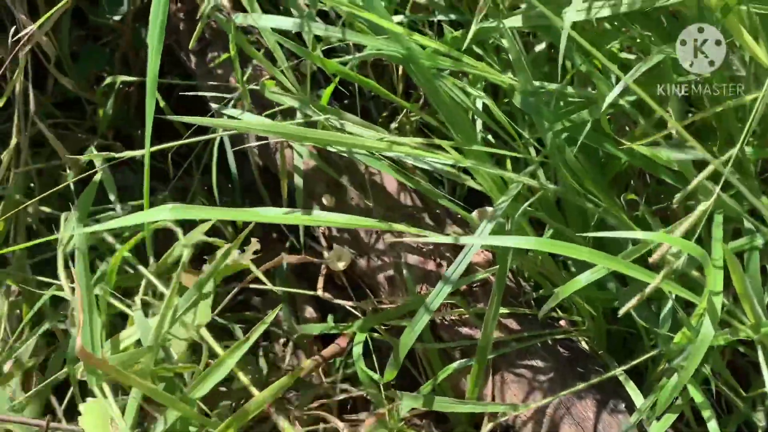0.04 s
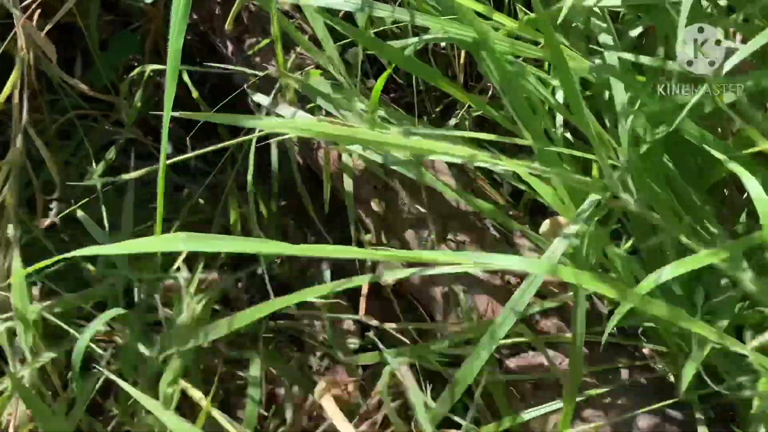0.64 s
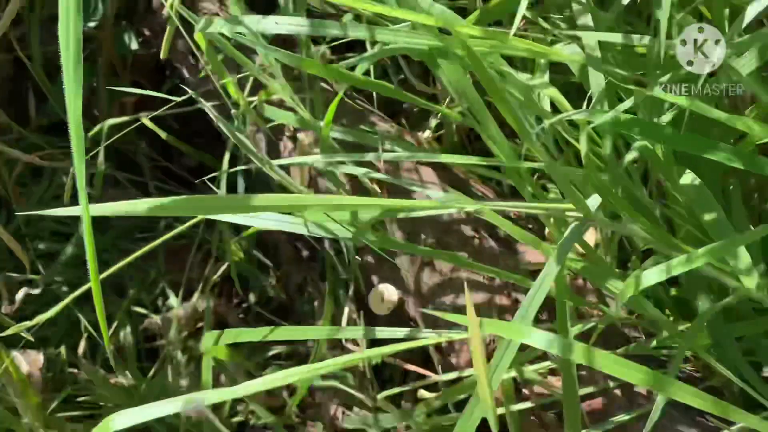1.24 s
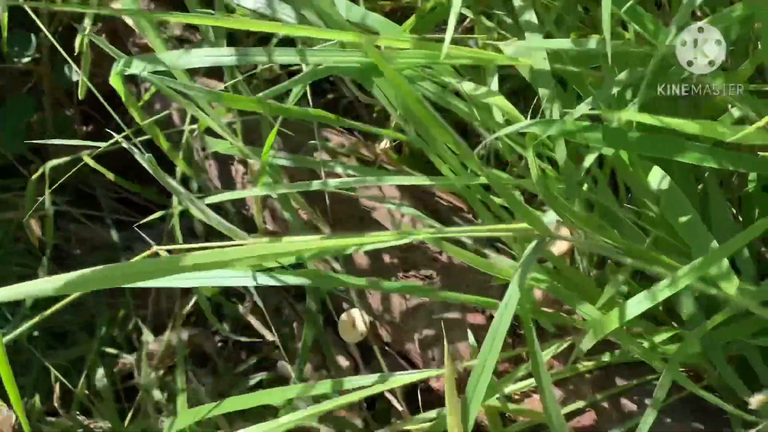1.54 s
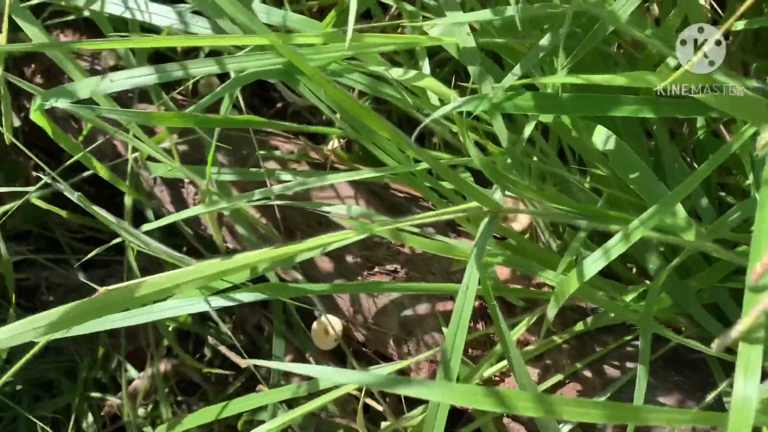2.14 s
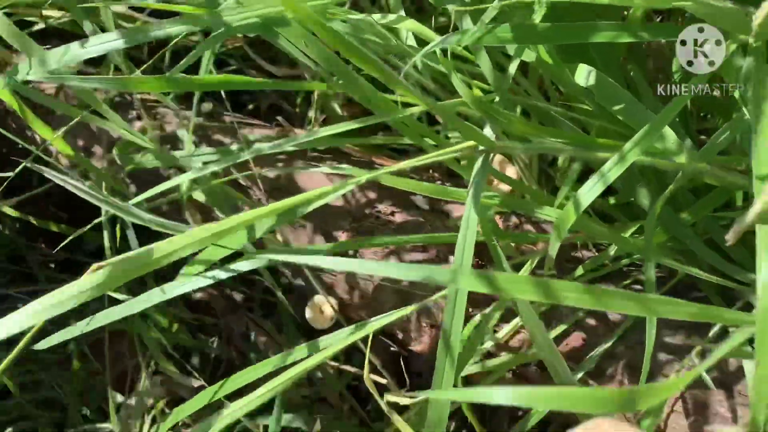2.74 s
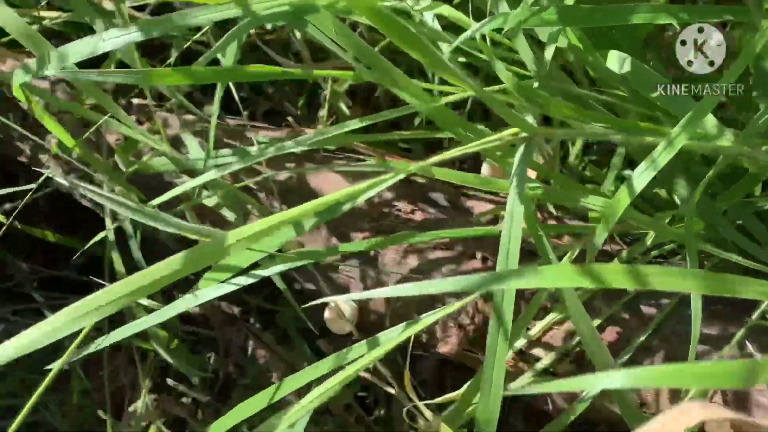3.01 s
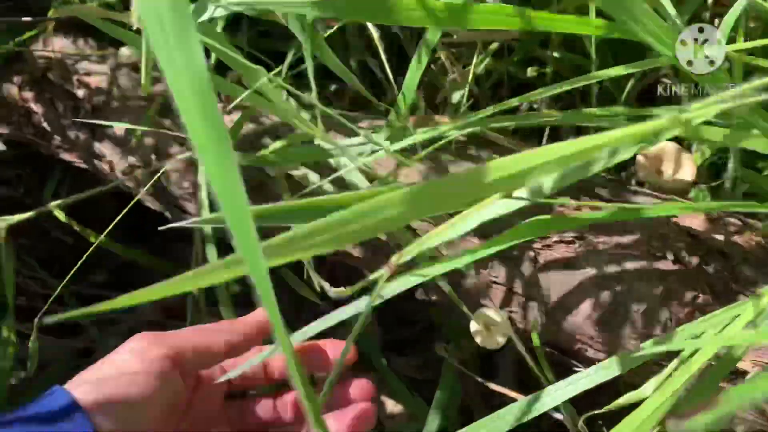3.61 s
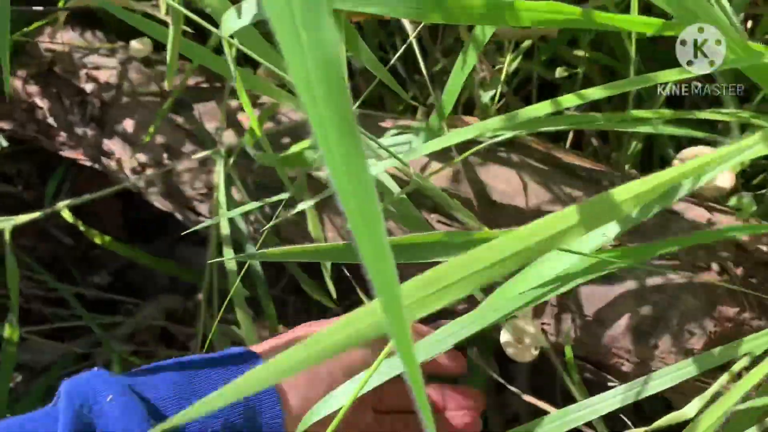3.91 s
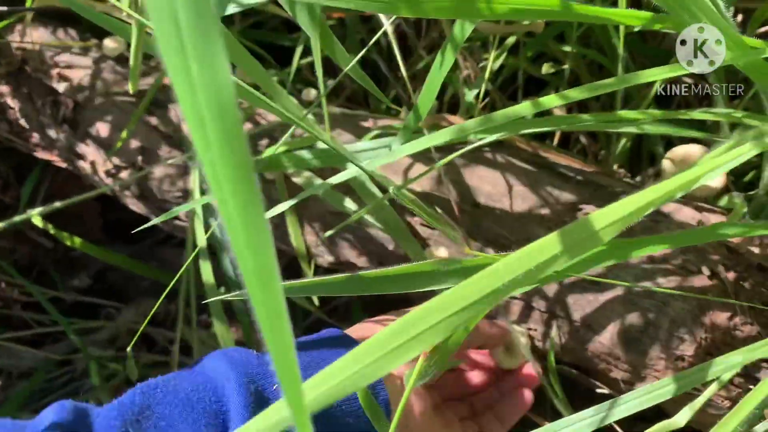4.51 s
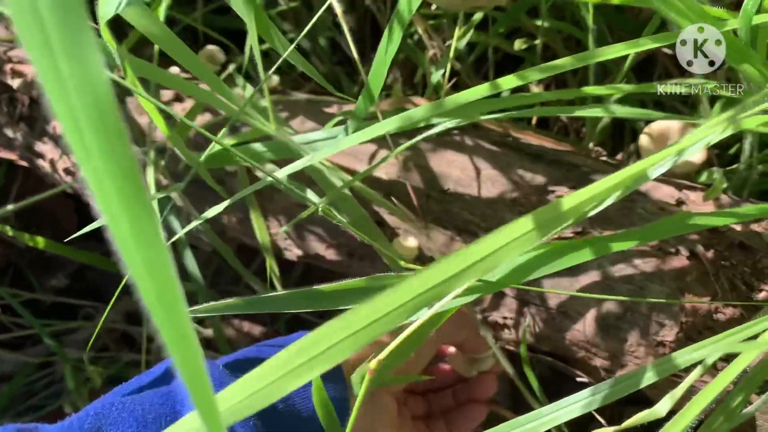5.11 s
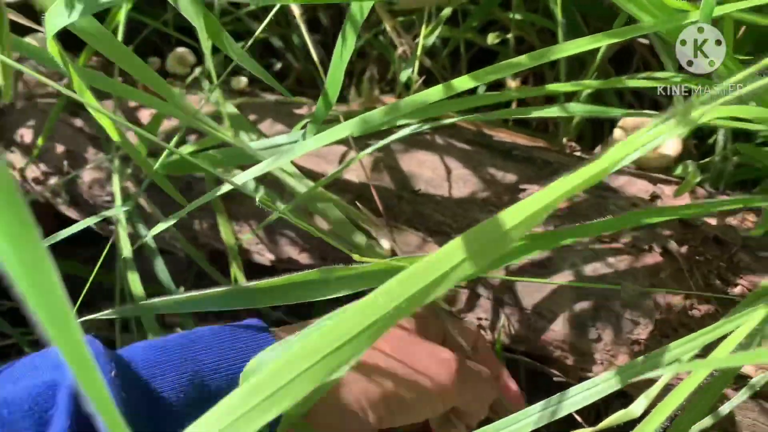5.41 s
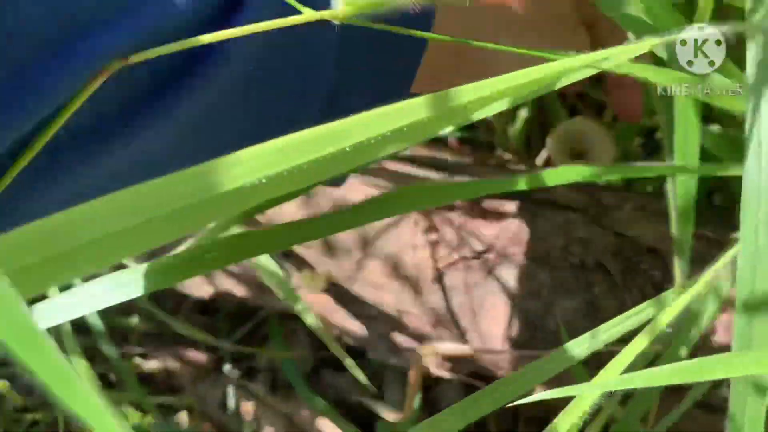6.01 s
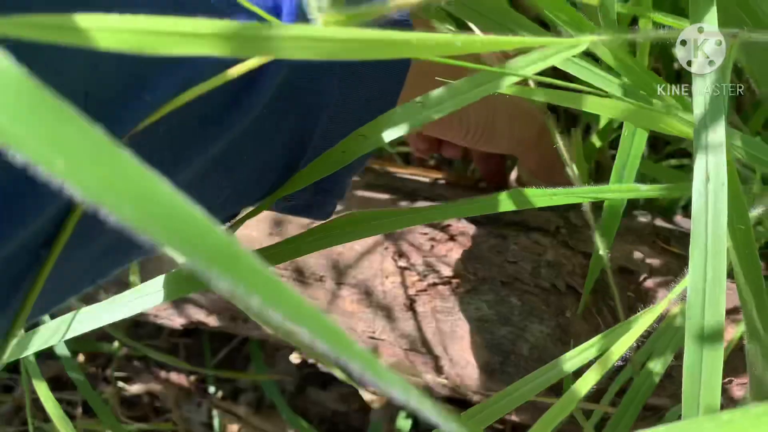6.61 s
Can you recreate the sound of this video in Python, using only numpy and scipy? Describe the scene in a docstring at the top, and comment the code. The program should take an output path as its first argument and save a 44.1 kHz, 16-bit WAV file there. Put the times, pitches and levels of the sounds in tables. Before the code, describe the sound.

Tall grass swishes and scrapes close against the microphone, with crisp stem snaps, then softens to a faint rustle and a few clicks.

```python
"""Tall grass swishes as someone pushes through it: rough blades slide over a low-held phone and
stalks bump it. Then a sleeved arm reaches down to a log, stems snap softly under the hand and
the grass stirs again. The phone's two closely spaced microphones (mics) hear all this over
a quiet outdoor rumble and one faint bird peep."""
import sys
import numpy as np
from scipy import signal
from scipy.fft import rfft, irfft, next_fast_len
from scipy.io import wavfile
from scipy.ndimage import uniform_filter1d, map_coordinates

SR = 44100
rng = np.random.default_rng(int(sys.argv[2]) if len(sys.argv) > 2 else 0)


def inscribe(sig):
    """Save sig as 16-bit PCM at rate SR to the path in sys.argv[1].

    A 1-D sig is mono; a 2-D sig holds one channel per row.
    Samples are clipped to [-1, 1] before scaling.
    """
    pcm = np.round(np.clip(np.atleast_2d(sig).T, -1, 1) * 32767)
    wavfile.write(sys.argv[1], SR, pcm.astype(np.int16))


N = 297675  # 6.75 seconds

# How alike the two mics sound at each pitch: (frequency [Hz], likeness [0-1], left mic's lead [radians])
MIC_PAIR = [(40, 0.87, 0.5), (153, 0.75, 0.12), (357, 0.87, 0.6), (694, 1, 1.83), (1050, 0.37, 1.5),
            (1520, 0.15, 2.5), (2520, 0.04, 2), (4950, 0.05, 6.5), (6180, 0.35, 6.5), (9130, 0.72, 2.5),
            (10420, 0.83, 0.5), (13480, 1, -3), (14900, 0.9, -5)]
# A "colour" says how strong the low and high pitches of a noise are.
# The deep rumble of the open air: (frequency [Hz], level [dB])
RUMBLE_COLOUR = [(12, -49), (20, -19), (60, 1.5), (109, -6.5), (151, -5), (258, -17), (328, -27),
                 (369, -31), (700, -20.5), (910, -56), (1540, -120)]
# The sleeve sliding along the log: (time [s], level [dB])
SLEEVE_LEVELS = [(3.9, -90), (4.1, -64.5), (4.35, -83), (4.55, -79.5), (5.45, -82), (5.53, -67.5),
                 (5.62, -66), (5.73, -67), (5.79, -67), (5.85, -86)]
# The dull sound of cloth on bark: (frequency [Hz], level [dB])
CLOTH_COLOUR = [(90, -48), (255, 4), (330, 1), (450, 3), (620, -10), (1500, -35)]
# Stalks knocking on the phone or the log. A "decay" is the time a sound takes to fade by 60 dB:
# (time [s], level [dB], first pitch [Hz], last pitch [Hz], decay [s])
STALK_THUMPS = [(0.133, -50, 258, 150, 0.053), (0.162, -49, 260, 89.5, 0.12), (0.385, -41, 290, 110, 0.078),
                (1.824, -40, 257, 78.6, 0.075), (2.354, -38.5, 328, 240, 0.04),
                (3.21, -37.5, 450, 60, 0.091), (3.662, -55.5, 81, 55.3, 0.47), (3.997, -46, 136, 50, 0.14),
                (4.658, -41, 407, 350, 0.018), (4.8672, -30.5, 374, 284, 0.022)]
# Short drags of a stalk, a leaf or the cuff:
# (middle time [s], level [dB], pitch [Hz], length [s], level half an octave from the pitch [dB])
SHORT_DRAGS = [(0.105, -37, 1330, 0.0091, -11), (0.113, -36.5, 4500, 0.0088, -7),
               (0.154, -40, 3000, 0.0049, -15), (0.141, -41.5, 950, 0.015, -11),
               (0.388, -37.5, 750, .007, -7), (0.76, -37.5, 3400, 0.0086, 0), (1.114, -41, 870, 0.005, -7),
               (1.356, -43, 1400, .004, -11), (1.43, -48, 840, 0.01, -7.5), (1.993, -54, 1200, 0.0053, 1),
               (2.208, -46, 730, 0.0062, -4), (2.349, -47, 1030, 0.0058, -6),
               (2.579, -50, 1000, 0.0038, -10), (2.628, -43.5, 466, 0.00524, -9),
               (2.73, -43.5, 543, 0.0052, -16), (2.746, -44, 4200, 0.0013, -1),
               (2.847, -43, 1200, 0.004, -3), (2.948, -38.5, 1400, 0.005, -1.5),
               (3.064, -38.5, 1310, .006, -6), (3.803, -53.5, 5600, 0.015, -15),
               (3.895, -56.5, 5030, 0.0072, -3), (4.085, -63.5, 4930, 0.024, -4),
               (4.871, -53, 800, 0.0039, 0), (5.454, -72, 5000, 0.031, -9),
               (5.597, -49.5, 1080, 0.025, -21), (5.612, -45.5, 970, 0.0055, -21),
               (5.698, -56, 960, 0.0068, -20), (5.865, -59.5, 4200, 0.0086, -4),
               (6.662, -64, 4900, 0.015, -9), (6.707, -62, 4730, 0.0091, -9)]
# Stems cracking; ring and wood are relative to the crack:
# (time [s], crack level [dB], treble [dB], decay [s], ring pitch [Hz], ring [dB], wood [dB])
STEM_SNAPS = [(0.1793, -32.5, 5, 0.017, 3180, -2, -2), (0.371, -33.5, 17, 0.046, 2130, -5, -24),
              (1.3261, -23, 3, 0.0096, 5800, -7, -10), (1.42, -35.5, -10, 0.017, 2200, 11.5, -4),
              (2.492, -29, -12, 0.0081, 4500, -3, -11), (2.562, -29, 6, 0.0088, 5000, -2, -18),
              (2.5841, -24, 6, 0.0092, 4450, 2, -11), (2.626, -15.5, -5, 0.0048, 4950, 2.5, -26),
              (2.6873, -29.5, 8, 0.0089, 1490, 4.5, -0.5), (2.832, -31, -4, 0.011, 5240, 1, -19),
              (2.902, -34, -3, 0.0092, 2700, 12, -21), (2.9762, -34, -9.5, 0.036, 3990, 0, -1),
              (3.142, -27.5, 3, 0.0089, 2940, -1, -9), (3.208, -29.5, -1, 0.0076, 1570, 10.5, 3),
              (3.318, -38, -6, 0.0098, 1490, -12, 3), (3.4202, -38, -12, 0.012, 1340, -2, -4),
              (3.5355, -48, -9, 0.011, 1700, 9, 3), (3.623, -57, -29, 0.031, 4050, 8, 1),
              (3.775, -56, -19, 0.054, 4090, 9.5, 11), (3.821, -50, -10, 0.013, 5440, 6.5, -11),
              (3.985, -61, -18, 0.09, 1440, 6.5, 0), (4.053, -46, 2, .008, 9400, -2, -7),
              (4.184, -57, -27, 0.0073, 1040, 19, 5), (4.656, -42, 10, 0.026, 1650, -5.5, -8),
              (4.721, -61, -3, 0.025, 1460, 0, -4), (4.8634, -33, 3, 0.008, 2660, 2, -8),
              (4.866, -36.5, -1, 0.011, 5450, -9, -3.5), (5.135, -49, -17, 0.015, 1520, 5, -6),
              (5.136, -43.5, -44, 0.0043, 2130, 24, 7.5), (5.606, -39, -5, 0.034, 4300, -3, 5.5),
              (6.276, -48.5, -10, 0.0094, 2430, 3, -12), (6.39, -56, -34, 0.028, 680, 3, 7.5),
              (6.572, -43, -9, 0.026, 3070, -6, -6), (6.647, -50.5, -5, 0.02, 5500, -12, -18),
              (6.702, -52.5, -10, 0.0058, 4720, 20, -17)]
# The woody tones that all snaps share: (frequency [Hz], relative level [dB], decay [s])
WOOD_TONES = [(933, -10, 0.024), (1575, -12.5, 0.043), (2190, -8.5, 0.033), (3040, -7, 0.012)]
# The crackle of bent blades: (time [s], level [dB])
CRACKLE_LEVELS = [(0, -76), (2.3, -60), (2.55, -47), (2.78, -51.5), (2.98, -53), (3.25, -56.5),
                  (3.55, -68.5), (4.1, -72.5), (4.6, -85), (5.3, -97), (5.65, -59), (5.82, -72), (6.3, -71),
                  (6.55, -92), (6.68, -64.5)]
# The tones at which the phone's case rings: (frequency [Hz], level [dB])
CASE_TONES = [(400, -3.5), (970, -2), (1500, 0), (3340, -1.5), (3900, -1.5), (4400, -7), (4900, 1)]
# Blades scraping the case:
# (peak time [s], level [dB], rise [s], fall [s], left mic's lead [s], rasp pitch [Hz],
#  case ring relative to the rasp [dB])
BLADE_SCRAPES = [(0.13, -51.5, 0.09, 0.041, 0.0003, 1280, -7),
                 (0.57, -42.5, 0.039, 0.054, 0.00035, 2400, -21),
                 (0.755, -45.5, 0.075, 0.054, 0.00038, 2380, -8),
                 (0.901, -49, 0.0096, .022, 0.00026, 2800, -16),
                 (1.13, -55.5, 0.024, 0.075, 0.00024, 2400, 2),
                 (1.82, -63.5, 0.045, 0.084, 0.000067, 1500, 2),
                 (2.615, -51, 0.13, 0.12, 0.00023, 1400, 1.5), (2.94, -52, 0.1, 0.13, 0.00021, 1530, 2.5),
                 (3.23, -55, 0.093, 0.047, 0.00022, 1400, 1)]
# The rasp of one scrape: (frequency [multiple of the rasp pitch], level [dB])
RASP_COLOUR = [(.3, -8), (.65, 5), (1, 4), (1.45, -9.5), (2.2, -10), (4, -47)]
# The low rub of stiff stalks: (frequency [Hz], level [dB])
RUB_COLOUR = [(30, -16), (70, -7.5), (150, -3.5), (260, 2.5), (420, 1), (610, -3), (930, 1), (1200, -1.5),
              (1550, 0), (2100, -4), (4500, -29.5)]
# The fine, high fizz on top of the swish: (frequency [Hz], level [dB])
FIZZ_COLOUR = [(4500, -25), (7500, -4), (10300, 0), (13500, -4), (16000, -4.5)]
# The swish of sliding blades: (frequency [Hz], level [dB])
SWISH_COLOUR = [(800, -40), (1500, -12.5), (2300, -3), (3300, -3), (4500, -2.5), (5700, -5), (7000, -4.5),
                (9000, -4.5), (16000, -7.5)]
# The grass stirring all along, hard while it is walked through and lightly under the hand:
# (time [s], swish level [dB], fizz relative to the swish [dB])
GRASS_STIR = [(0, -46, -6), (0.33, -43.5, -2), (0.45, -55, 5), (1.05, -49, 4.5), (1.28, -44.5, 3),
              (1.38, -45.5, -1), (1.7, -47, 1), (1.95, -53.5, 2), (2.28, -59.5, -2), (2.5, -47.5, -4),
              (3.2, -48, -4), (3.45, -60.5, -5), (3.7, -65, -15), (4.4, -65, -12), (4.6, -74, -5),
              (5.33, -73, -2), (5.55, -67, -6), (6.25, -67.5, -6), (6.5, -72.5, 0.5), (6.75, -63.5, -5)]
# Single tufts swept aside; fizz and rub are relative to the swish:
# (peak time [s], swish level [dB], rise [s], fall [s], fizz [dB], rub [dB])
GRASS_STROKES = [(0.12, -42, 0.058, 0.06, -15, -1), (0.39, -41.5, 0.032, 0.044, -1, -9),
                 (0.57, -36.5, 0.15, 0.063, 0.5, -14), (0.75, -36, 0.079, 0.11, 2.5, -13),
                 (0.87, -39, 0.047, 0.11, 1, -16.5), (1.14, -42, 0.15, 0.11, 0, -11.5),
                 (1.84, -41, 0.094, 0.053, -1, -7), (1.99, -56, 0.013, 0.025, -7, 8),
                 (2.07, -48, 0.058, 0.03, 0, -7), (2.19, -56, 0.081, 0.061, -6, 1.5),
                 (2.37, -50, 0.061, 0.026, -7, -7.5), (2.61, -40, 0.1, 0.089, 1, -12),
                 (2.95, -42, 0.11, 0.11, 0, -9.5), (3.2, -62, 0.082, 0.13, -7, 7),
                 (3.998, -59.5, 0.014, 0.011, -13, 4.5), (5.61, -51.5, 0.018, 0.025, -7, -7),
                 (5.67, -56.5, 0.081, 0.081, -12, -3), (6.14, -64, 0.11, 0.071, -18, -8)]


def amp(db):
    """Turn decibels into a number to multiply a sound by."""
    return 10 ** (np.asarray(db) / 20)


def unit(x):
    """Scale a sound so that its average strength (rms) is 1."""
    return x / np.sqrt(np.mean(x ** 2) + 1e-20)


def look_up(table, hz, column=1):
    """Read a frequency table between its rows, on a logarithmic pitch scale."""
    columns = np.transpose(table)
    return np.interp(np.log(hz + 1), np.log(columns[0] + 1), columns[column])


def curves(table):
    """Turn each column after the time into one value per sample."""
    times, *columns = np.transpose(table)
    return [np.interp(np.arange(N) / SR, times, column) for column in columns]


def wobble(rate):
    """A smooth curve through `rate` random points a second."""
    return map_coordinates(rng.standard_normal(int(N * rate / SR) + 4), [np.arange(N) * rate / SR])


def add(track, start, sound):
    """Mix a sound into the track, beginning at `start` seconds."""
    part = track[:, max(round(start * SR), 0):][:, :sound.shape[-1]]
    part += sound[..., :part.shape[-1]]


def filtered(x, response):
    """Scale and shift each frequency of a sound by response(hz)."""
    n = x.shape[-1]
    padded = next_fast_len(n + 4096)
    return irfft(rfft(x, padded) * response(np.fft.rfftfreq(padded, 1 / SR)), padded)[..., :n]


def at_mics(pair, colour):
    """Blend two noises into a coloured left and right, most alike in the bass and the top treble."""
    n = pair.shape[-1]
    padded = next_fast_len(n + 4096)
    hz = np.fft.rfftfreq(padded, 1 / SR)
    blend = np.arccos(np.clip(look_up(MIC_PAIR, hz), 0, 1)) / 2
    mid, side = rfft(pair, padded) * amp(look_up(colour, hz)) * [np.cos(blend), np.sin(blend)]
    lead = np.exp(.5j * look_up(MIC_PAIR, hz, column=2))
    return unit(irfft(np.array([(mid + side) * lead, (mid - side) / lead]), padded)[:, :n])


def aimed(x, colour, lead_s):
    """Colour one close sound and let it reach the left mic lead_s seconds before the right."""
    sides = np.array([[1], [-1]])
    return unit(filtered(x, lambda hz: amp(look_up(colour, hz)) * np.exp(1j * np.pi * hz * lead_s * sides)))


def friction(rate, spread_db, fade_s, hiss, size=N):
    """Rubbing is many tiny slips, about `rate` a second: uneven bursts of noise over a smooth hiss."""
    slipping = rng.random(size) < rate / SR
    strength = np.minimum(rng.exponential(size=size), 4)
    slips = slipping * amp(spread_db * strength) ** 2
    power = signal.lfilter([1], [1, -np.exp(-1 / (fade_s * SR))], slips)  # each slip dies away
    return np.sqrt(power / power.mean() + hiss) * rng.standard_normal((2, size))


def patchy(x, depth_db):
    """Each touching blade favours its own pitches for a few hundredths of a second."""
    spectrum = signal.stft(x, nperseg=1024)[2]
    patches = rng.standard_normal(spectrum.shape[1:])
    for axis in (0, 1):  # smooth across pitch, then across time
        patches = uniform_filter1d(patches, size=4, axis=axis)
    return unit(signal.istft(spectrum * amp(depth_db * unit(patches)), nperseg=1024)[1][:, :N])


def taps(count, centre_hz, pitch_spread, cycles, spread_db, lead_s):
    """Blades flick each other at random; each rings briefly at its own pitch, from its own direction."""
    t = np.arange(SR // 50) / SR
    start = rng.integers(0, N, (count, 1))
    pitch, angle, pan = rng.standard_normal((count, 3)).T[..., None]
    hz = np.clip(centre_hz * np.exp(pitch_spread * pitch), 300, 12000)
    strength = amp(spread_db * np.minimum(rng.exponential(size=(count, 1)), 3))
    ring = strength * np.exp(-t * hz / cycles) * (1 - np.exp(-t * hz))
    where = (start + np.arange(len(t))).ravel()
    channels = []
    for side in (1, -1):
        arrival = t + side * lead_s * (1 + angle / 2) / 2
        ticks = amp(side * pan) * ring * np.sin(2 * np.pi * hz * arrival)
        channels.append(np.bincount(where, ticks.ravel(), N)[:N])
    return unit(np.array(channels))


def hollow(x, echo_s=0.001633, share=0.25):
    """A quick inverted echo at the phone makes close bumps and scrapes sound hollow, like a tube."""
    return filtered(x, lambda hz: 1 - share * np.exp(-2j * np.pi * hz * echo_s)) / np.hypot(1, share)


def outdoors(level_db):
    """The low rumble of the open air, swaying a little in level."""
    sway_db = 1.2 * wobble(6)
    return amp(level_db + sway_db) * at_mics(rng.standard_normal((2, N)), RUMBLE_COLOUR)


def bird(start_s, level_db, first_hz, last_hz, length_s):
    """One faint, rising peep from far away."""
    out, progress = np.zeros((2, N)), np.linspace(0, 1, round(length_s * SR))
    hz = first_hz + (last_hz - first_hz) * np.sin(np.pi * progress / 2)
    tone = np.sin(2 * np.pi * np.cumsum(hz) / SR)
    add(out, start_s, amp(level_db) * np.sin(np.pi * progress) * tone)
    return out


def sleeve():
    """Soft cloth catches on the bark in dull, uneven lumps."""
    level_db, = curves(SLEEVE_LEVELS)
    slips = friction(rate=210, spread_db=3.5, fade_s=0.022, hiss=0.19)
    return amp(level_db) * at_mics(slips, CLOTH_COLOUR)


def thumps(glide_cycles, attack_cycles, roughness, lead_s):
    """High pitches run faster along a bending stalk, so each knock arrives as a quickly falling tone."""
    out, t = np.zeros((2, N)), np.arange(SR // 4) / SR
    for start, db, first_hz, last_hz, decay in STALK_THUMPS:
        hz = last_hz + (first_hz - last_hz) * np.exp(-t * first_hz / glide_cycles)
        tone = np.sin(2 * np.pi * (np.cumsum(hz) / SR - hz * np.array([[0], [lead_s]])))
        colour = [(last_hz / 2, -15), (first_hz, 0), (first_hz * 4, -30), (SR / 2, -80)]
        thud = at_mics(rng.standard_normal((2, len(t))), colour)
        rise = 1 - np.exp(-t * first_hz / attack_cycles)
        add(out, start, amp(db - 60 * t / decay) * rise * (tone + roughness * thud))
    return out


def drags(lead_s):
    """A stalk catches and judders: a firm one close to one pitch, a limp one as a broad, dull bump."""
    out, t = np.zeros((2, N)), np.arange(SR // 5) / SR
    for middle, db, hz, length, edge_db in SHORT_DRAGS:
        colour = [(hz / 4, 3 * edge_db), (hz / np.sqrt(2), edge_db), (hz, 0),
                  (hz * np.sqrt(2), edge_db), (SR / 2, -60)]
        swell = np.exp(-2 * (t / length - 2) ** 2)
        judder = swell * aimed(rng.standard_normal(len(t)), colour, lead_s)
        add(out, middle - 2 * length, amp(db) * unit(judder) * np.sqrt(np.mean(swell ** 2)))
    return out


def snaps(shiver_db, shiver_decay_s, wood_detune, lead_s, attack_s):
    """Fibres crack, the stem rings at its own pitch over woody tones, and nearby blades shiver."""
    out, t = np.zeros((2, N)), np.arange(SR // 8) / SR
    arrival = t - np.array([[0], [lead_s]])
    rise = 1 - np.exp(-t / attack_s)
    tone = lambda hz: np.sin(2 * np.pi * (hz * arrival + rng.random()))
    for start, db, treble_db, decay, ring_hz, ring_db, wood_db in STEM_SNAPS:
        colour = [(200, -26), (1000, -4.0), (4500, 1.0), (11000, treble_db), (16000, treble_db - 5.5)]
        crack = at_mics(rng.standard_normal((2, len(t))), colour)
        wood = sum(amp(level - 60 * t / wood_decay) * tone(hz * (1 + wood_detune * rng.normal()))
                   for hz, level, wood_decay in WOOD_TONES)
        stem = amp(-60 * t / decay) * (crack + amp(ring_db) * tone(ring_hz))
        shiver = amp(shiver_db - 60 * t / shiver_decay_s) * crack
        add(out, start, amp(db) * rise * (stem + amp(wood_db) * wood + shiver))
    return out


def crackle():
    """Bent blades crease in dense, crisp ticks."""
    level_db, = curves(CRACKLE_LEVELS)
    ticks = taps(count=4000, centre_hz=4700, pitch_spread=.2, cycles=3, spread_db=2.7, lead_s=0.00019)
    return amp(level_db) * ticks


def case_response(hz, width_hz=85):
    """The phone's case rings most strongly in a narrow band around each of its own tones."""
    return sum((-1) ** k * amp(db) * 1j * hz * width_hz / (tone_hz ** 2 - hz ** 2 + 1j * hz * width_hz)
               for k, (tone_hz, db) in enumerate(CASE_TONES))


def scrapes():
    """A flat blade rasps along the case, so close that both mics hear the same slips; catches ring it."""
    out, t = np.zeros((2, N)), np.arange(-SR // 3, SR // 3) / SR
    for peak, db, rise, fall, lead_s, rasp_hz, ring_db in BLADE_SCRAPES:
        slips = friction(rate=400, spread_db=1.0, fade_s=0.0015, hiss=0.39, size=len(t))[0]
        rasp = aimed(slips, [(ratio * rasp_hz, level) for ratio, level in RASP_COLOUR], lead_s)
        catches = friction(rate=130, spread_db=2.5, fade_s=0.0012, hiss=0.2, size=len(t))[0]
        ring = aimed(filtered(catches, case_response), [(0, 0)], lead_s)  # no extra colour
        swell = np.exp(-(t / np.where(t < 0, rise, fall)) ** 2 / 2)
        add(out, peak + t[0], amp(db) * swell * (rasp + amp(ring_db) * ring))
    return out


def grass_levels(rub_offset_db=-6, rub_growth=0.89, pivot_db=-56):
    """Levels in dB of swish, fizz and rub: each swept tuft swells and fades on top of the ongoing stir."""
    t = np.arange(N) / SR
    stir_db, bright_db = curves(GRASS_STIR)
    stalks_db = pivot_db + rub_offset_db + rub_growth * (stir_db - pivot_db)
    power = amp([stir_db, stir_db + bright_db, stalks_db]) ** 2
    for peak, db, rise, fall, fizz_db, rub_db in GRASS_STROKES:
        swell = np.exp(-((t - peak) / np.where(t < peak, rise, fall)) ** 2)
        power += amp([[db], [db + fizz_db], [db + rub_db]]) ** 2 * swell
    return 10 * np.log10(power)


def grass():
    """Toothed blade edges hiss under a fluttering grip; stiff stalks and the sleeve rub in low lumps."""
    swish_db, fizz_db, rub_db = grass_levels()
    grip_db = 0.8 * wobble(28)
    teeth = patchy(friction(rate=1300, spread_db=4.0, fade_s=0.0031, hiss=1.0), depth_db=3.0)
    flicks = taps(count=3500, centre_hz=4106, pitch_spread=.3, cycles=21, spread_db=1.5, lead_s=0.00014)
    swish = amp(swish_db + grip_db) * (amp(-1.0) * at_mics(teeth, SWISH_COLOUR) + amp(-12.0) * flicks)

    hairs = patchy(friction(rate=2400, spread_db=4.5, fade_s=0.0005, hiss=0.7), depth_db=8.0)
    fizz = amp(swish_db + fizz_db + grip_db) * at_mics(hairs, FIZZ_COLOUR)

    lumps = patchy(friction(rate=130, spread_db=-1.0, fade_s=0.0032, hiss=1.0), depth_db=2.0)
    knocks = taps(count=900, centre_hz=1200, pitch_spread=.25, cycles=3, spread_db=3, lead_s=.00028)
    rub = amp(rub_db + 0.093 * wobble(44)) * (amp(-0.8) * at_mics(lumps, RUB_COLOUR) + amp(-9.5) * knocks)
    return swish + fizz + rub


def scene():
    """Mix the moving grass, the sleeve, the snaps and the bumps over the outdoor background."""
    stems = snaps(shiver_db=-26, shiver_decay_s=0.15, wood_detune=0.0093, lead_s=0.00017, attack_s=0.00062)
    bumps = thumps(glide_cycles=3.16, attack_cycles=0.65, roughness=0.41, lead_s=0.0004)
    bumps += hollow(drags(lead_s=0.00024))
    background = outdoors(level_db=-70.5)
    background += bird(start_s=4.495, level_db=-74, first_hz=1690, last_hz=1970, length_s=0.068)
    return grass() + hollow(scrapes() + crackle()) + sleeve() + stems + bumps + background


def record(dry):
    """The phone keeps nothing above 15950 Hz."""
    return filtered(dry, lambda hz: hz < 15950)


dry = scene()
out = record(dry)
inscribe(out)
```